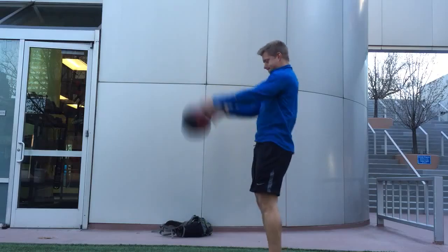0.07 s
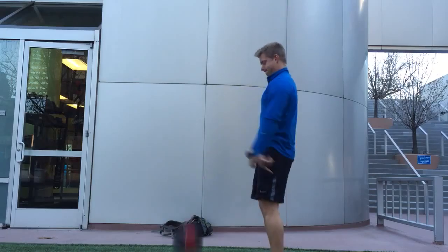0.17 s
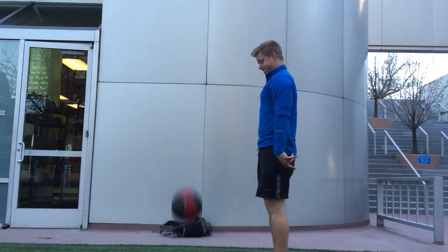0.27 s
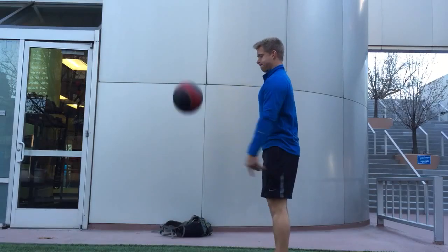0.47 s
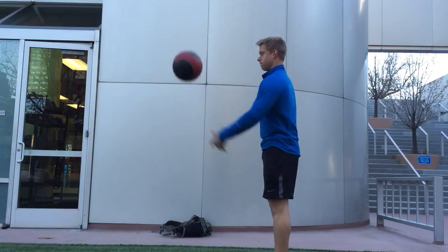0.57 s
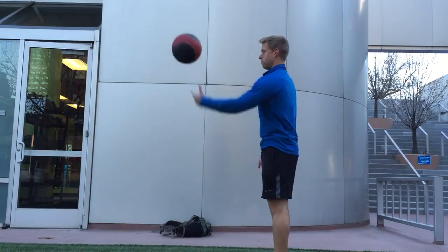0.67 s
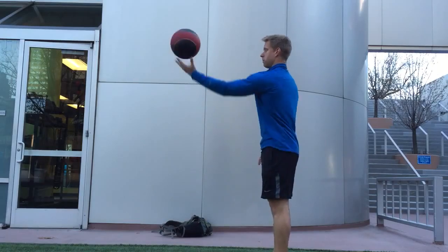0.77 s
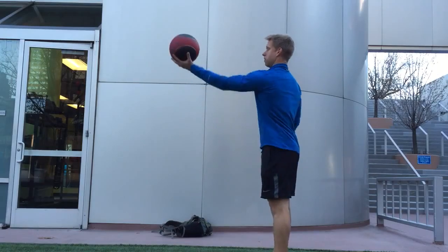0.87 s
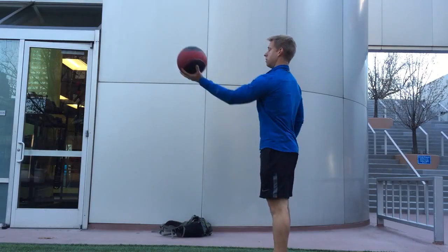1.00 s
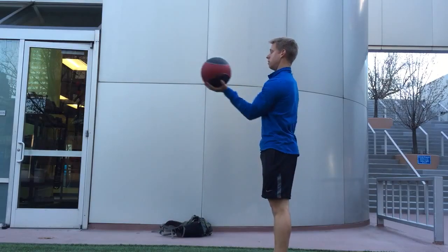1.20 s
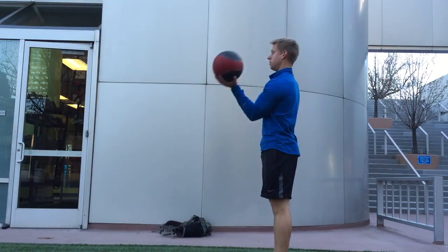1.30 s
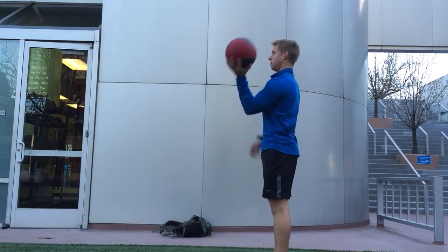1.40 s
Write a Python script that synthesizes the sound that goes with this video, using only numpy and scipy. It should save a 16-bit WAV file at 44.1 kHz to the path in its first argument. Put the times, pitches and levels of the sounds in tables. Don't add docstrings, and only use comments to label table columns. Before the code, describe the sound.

One sharp, booming smack of a weighted ball on outdoor ground, with faint traffic and fan drone

```python
import sys
import numpy as np
from scipy import signal
from scipy.fft import rfft, irfft, next_fast_len
from scipy.io import wavfile
from scipy.ndimage import uniform_filter1d, map_coordinates

SR = 44100
rng = np.random.default_rng(int(sys.argv[2]) if len(sys.argv) > 2 else 0)


def decibels_to_gain(level_db):
    exponent = np.asarray(level_db, float) / 20
    return 10 ** exponent


def pcm_store(signal):
    levels = np.round(np.clip(np.atleast_2d(signal), -1, 1) * 32767)
    wavfile.write(sys.argv[1], SR, levels.astype(np.int16).T)


N = 63945
T = np.arange(N) / SR

# (frequency [Hz], level [dB], t60 [s])
SHELL_MODES = [(6100, -42, 0.025), (2443, -39.5, 0.027), (1562, -16.5, 0.0073), (1317, -13, 0.0076),
               (704, -23.5, 0.034), (448, -12.5, 0.026), (394, -9, 0.029), (342, -13.5, 0.043)]
# (frequency [Hz], density [dB per Hz])
SLAP_COLOUR = [(800, -14), (2000, -10), (3100, -18), (5000, -5), (9000, -4), (10600, -15), (13000, -5),
               (15700, -12)]
# (delay [s], frequency [Hz], level [dB], t60 [s], push 1 or release -1 [sign])
MASS_MODES = [
    (.0108, 122, -8.5, 0.04, 1),
    (.0113, 178, -22, 0.09, 1),
    (.0130, 62, -11.5, 0.15, -1),
]
# (delay [s], level [dB])
ECHOES = [
    (0.0171, -11),
    (0.0204, -11.5),
]
# (middle [s], half length [s], level [dB])
RUSTLES = [
    (0.23, 0.025, -79),
    (0.264, 0.011, -73),
    (0.303, 0.011, -71),
    (0.272, .003, -73),
    (.364, .005, -78),
    (1.005, .012, -84),
]
# (frequency [Hz], density [dB per Hz])
CLOTH_COLOUR = [(2500, -25), (5000, -5), (9500, -3), (10500, -8), (12000, -2), (15700, 0)]
# (time [s], frequency [Hz], level [dB], t60 [s])
PALM_TAP = (1.3425, 870, -39, .04)
# (time [s], level [dB])
TYRE_LEVEL = [
    (0.0, -56.5),
    (0.286, -55.5),
    (0.646, -55.5),
    (0.848, -53),
    (1.45, -56),
]
# (frequency [Hz], density [dB per Hz])
RUMBLE_COLOUR = [(25, -42), (40, -12.5), (52, -6.5), (72, -5.5), (92, -8), (170, -7), (300, -15),
                 (480, -28)]
# (frequency [Hz], density [dB per Hz])
TYRE_COLOUR = [(400, -1.5), (650, -1), (1400, -8), (2400, -19.5), (5000, -36), (7000, -37), (11000, -42.5),
               (15700, -44)]
# (time [s], level [dB])
DRONE_LEVEL = [(0, -46), (.03, -37), (.15, -46), (.234, -33.5), (.28, -46), (.5, -45.5), (.63, -35.5),
               (.68, -47.5), (.76, -36), (.86, -41), (.915, -32.5), (1.01, -46), (1.26, -63), (1.31, -39),
               (1.45, -48.5)]
# (middle [s], half length [s], frequency [Hz], level [dB])
WHINES = [
    (0.915, .03, 6250, -82),
    (1.105, .02, 6220, -81),
    (1.165, 0.025, 6300, -82),
]

SLAM_S = 0.3692
SLAP_DB, SLAP_RISE_S, SLAP_HOLD_S, SLAP_T60_S = -45, 0.001, 0.0095, 0.016
SNAP_S, SNAP_HALF_S, SNAP_DB = 0.0036, 0.0009, -34.5
GRIT_DB, GRIT_T60_S, GRIT_START_S, GRIT_RISE_S = -60, 0.25, 0.014, 0.0025
GRIT_SETTLES_S, SETTLE_DB_PER_S = 0.036, 500
CLICK_S, WAKE_CYCLES = 0.0031, 0.45
MODE_RISE_CYCLES, PUSH_RISE_CYCLES = 0.7, 0.22
WALL_LOW_HZ, WALL_HIGH_HZ = 505, 2700
YARD_DB, YARD_T60_S, YARD_START_S, YARD_HIGH_HZ = -9.5, 0.07, 0.012, 2520
CLOTH_GRAIN_DB = 0.5
RUMBLE_DB, TYRES_DB, TYRE_PATCH_DB = -37, 3, 1.4
DRONE_HZ, DRONE_WIDTH_HZ, DRONE_DB = 129.84, 4.32, -2
WHINE_WIDTH_HZ, WHINE_FLUTTER_DB = 150, 2.5
DUCK_DB, DUCK_START_S, DUCK_BACK_S = -2, 0.425, 0.065
TOP_HZ, TOP_EDGE_HZ, ABOVE_TOP_DB = 15750, 150, -18


def unit(x):
    return x / np.sqrt(np.mean(x ** 2) + 1e-20)


def filtered(x, response):
    size = next_fast_len(N + SR // 4)
    spectrum = rfft(x, size) * response(np.fft.rfftfreq(size, 1 / SR))
    return irfft(spectrum, size)[:N]


def noise(colour, patchy_db=0):
    z = signal.stft(rng.standard_normal(N + 512), nperseg=512)[2]
    patches = uniform_filter1d(rng.standard_normal(z.shape), 6, 0)
    patches = unit(uniform_filter1d(patches, 12, 1))
    x = signal.istft(z * decibels_to_gain(patchy_db * patches), nperseg=512)[1][:N]
    below, above = (colour[0][0] * 0.5, -120), (colour[-1][0] * 2, -120)
    f, db = np.transpose([below, *colour, above])
    return unit(filtered(x, lambda hz: decibels_to_gain(np.interp(np.log(hz + 1), np.log(f), db))))


def wobble(rate):
    return map_coordinates(rng.standard_normal(int(N * rate / SR) + 4), [T * rate])


def curve(rows):
    return np.interp(T, *np.transpose(rows))


def ring(start_s, hz, db, t60, rise_cycles):
    t = np.maximum(T - start_s, 0)
    envelope = decibels_to_gain(db - 60 * t / t60) * (1 - np.exp(-t * hz / rise_cycles))
    return envelope * np.sin(2 * np.pi * hz * t)


def swell(middle_s, half_s):
    return np.exp(-0.5 * ((T - middle_s) / half_s) ** 2)


def unsteady(hz, width_hz):
    pitch = hz + width_hz * wobble(41.26)
    return np.sqrt(2) * np.sin(2 * np.pi * np.cumsum(pitch) / SR)


def skin_slap():
    t = T - SLAM_S
    fall_db = -60 * np.maximum(t - SLAP_HOLD_S, 0) / SLAP_T60_S
    slap = decibels_to_gain(SLAP_DB + fall_db + 4.2 * wobble(900)) * np.clip(t / SLAP_RISE_S, 0, 1)
    snap = decibels_to_gain(SNAP_DB) * swell(SLAM_S + SNAP_S, SNAP_HALF_S)
    return (slap + snap) * noise(SLAP_COLOUR)


def shell():
    start = SLAM_S + CLICK_S
    return sum(ring(start + WAKE_CYCLES / hz, hz, db, t60, MODE_RISE_CYCLES)
               for hz, db, t60 in SHELL_MODES)


def grit():
    t = T - SLAM_S - GRIT_START_S
    fall_db = -60 * np.maximum(t, 0) / GRIT_T60_S
    settle_db = -SETTLE_DB_PER_S * np.maximum(t - GRIT_SETTLES_S, 0)
    level = decibels_to_gain(GRIT_DB + fall_db + settle_db + 1.7 * wobble(340))
    return level * np.clip(t / GRIT_RISE_S, 0, 1) * noise(SLAP_COLOUR)


def boom():
    return sum(way * ring(SLAM_S + delay, hz, db, t60, PUSH_RISE_CYCLES)
               for delay, hz, db, t60, way in MASS_MODES)


def walls(blow):
    def echo_response(f):
        low_cut = (1j * f / WALL_LOW_HZ) ** 2 / (1 + 1j * f / WALL_LOW_HZ) ** 2
        high_cut = 1 / (1 + 1j * f / WALL_HIGH_HZ) ** 2
        arrivals = sum(decibels_to_gain(db) * np.exp(-2j * np.pi * f * delay) for delay, db in ECHOES)
        return low_cut * high_cut * arrivals

    scatter = rng.standard_normal(N) * decibels_to_gain(-60 * T / YARD_T60_S) * (T > YARD_START_S)
    tail = signal.fftconvolve(blow, scatter / np.linalg.norm(scatter))[:N]
    tail = filtered(tail, lambda f: 1 / (1 + 1j * f / YARD_HIGH_HZ) ** 2)
    return filtered(blow, echo_response) + decibels_to_gain(YARD_DB) * tail


def jacket():
    level = sum(decibels_to_gain(db) * swell(middle, half) for middle, half, db in RUSTLES)
    grain = decibels_to_gain(CLOTH_GRAIN_DB * wobble(280))
    return level * unit(grain * noise(CLOTH_COLOUR, 1.0))


def palm_tap():
    return ring(*PALM_TAP, MODE_RISE_CYCLES)


def traffic():
    rumble = decibels_to_gain(RUMBLE_DB + 1.53 * wobble(5.79)) * noise(RUMBLE_COLOUR, 1.62)
    tyre_level = decibels_to_gain(curve(TYRE_LEVEL) + TYRES_DB + 0.9 * wobble(9.15))
    return rumble + tyre_level * noise(TYRE_COLOUR, TYRE_PATCH_DB)


def ventilation():
    return decibels_to_gain(curve(DRONE_LEVEL) + DRONE_DB) * unsteady(DRONE_HZ, DRONE_WIDTH_HZ)


def brake_whine():
    total = 0
    for middle, half, hz, db in WHINES:
        level = decibels_to_gain(db + WHINE_FLUTTER_DB * wobble(60.5)) * swell(middle, half)
        colour = [(hz + step * WHINE_WIDTH_HZ, density)
                  for step, density in [(-3, -25), (-1, -6), (0, 0), (1, -6), (3, -25)]]
        total = total + level * noise(colour)
    return total


def scene():
    blow = skin_slap() + shell() + grit()
    near = blow + walls(blow) + boom() + jacket() + palm_tap()
    far = traffic() + ventilation() + brake_whine()
    return (near + far)[None]


def roll_off(x):
    return signal.sosfilt(signal.butter(12, 16450, fs=SR, output="sos"), x)


def record(dry):
    u = np.maximum(T - DUCK_START_S, 0) / DUCK_BACK_S
    ducked = dry[0] * decibels_to_gain(DUCK_DB * u * np.exp(1 - u))

    def top_shelf(hz):
        return decibels_to_gain(ABOVE_TOP_DB * (1 + np.tanh((hz - TOP_HZ) / TOP_EDGE_HZ)) / 2)

    return roll_off(filtered(ducked, top_shelf)[None])


dry = scene()
out = record(dry)
pcm_store(out)
```